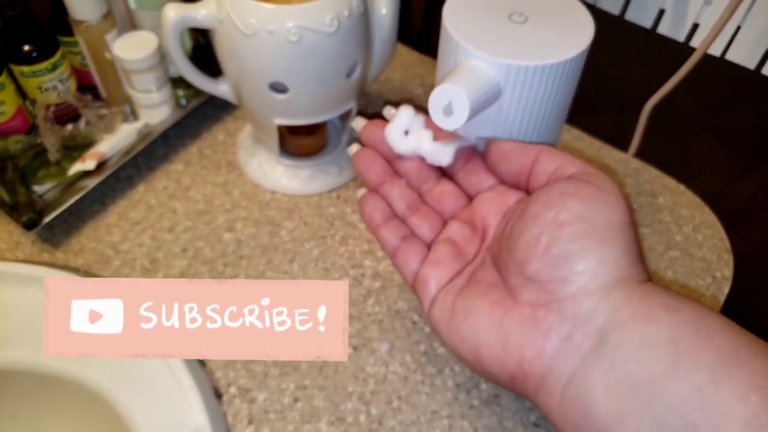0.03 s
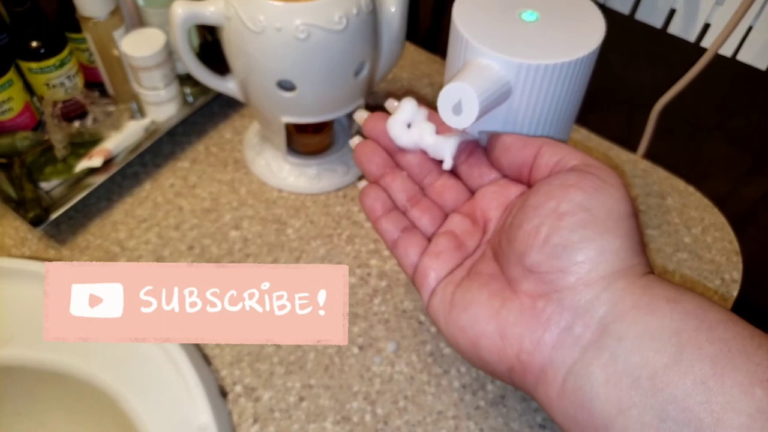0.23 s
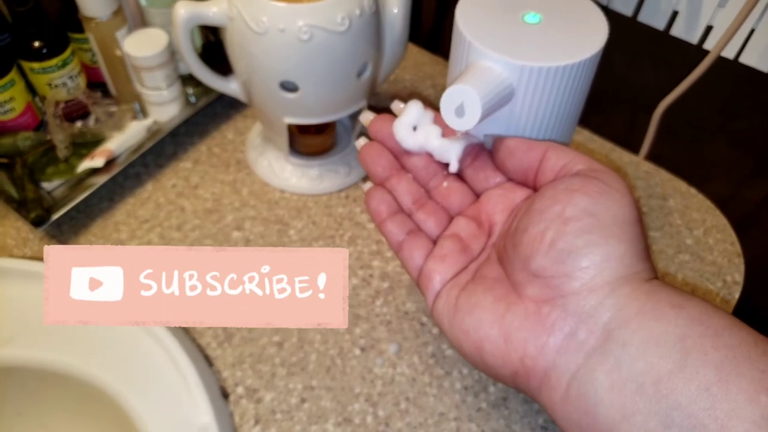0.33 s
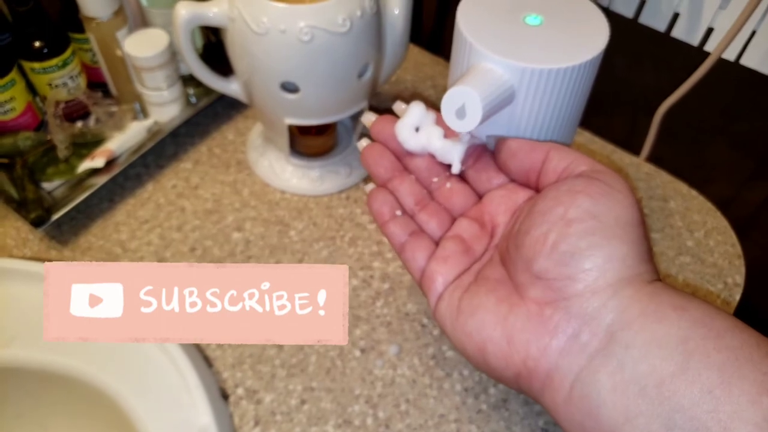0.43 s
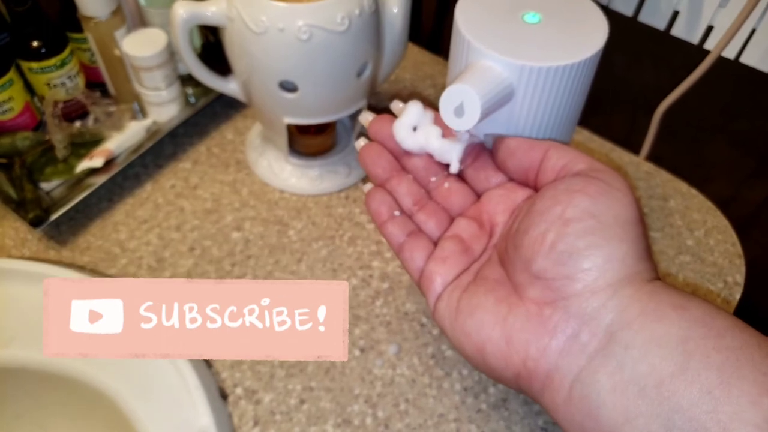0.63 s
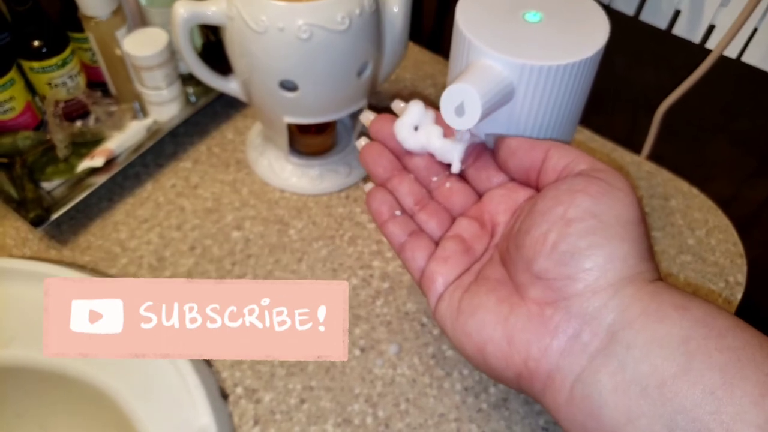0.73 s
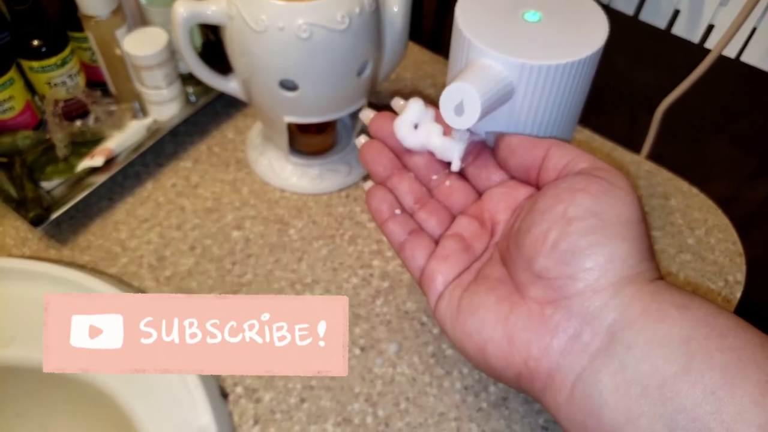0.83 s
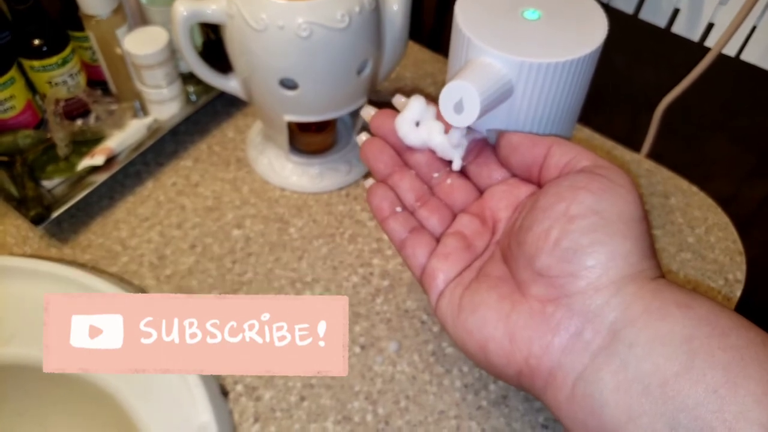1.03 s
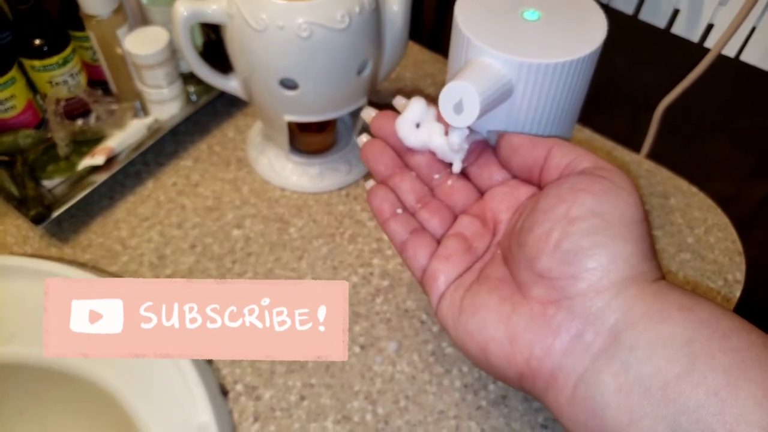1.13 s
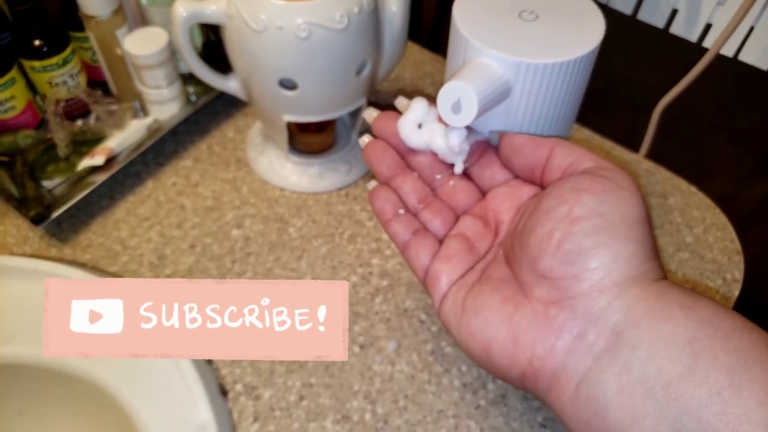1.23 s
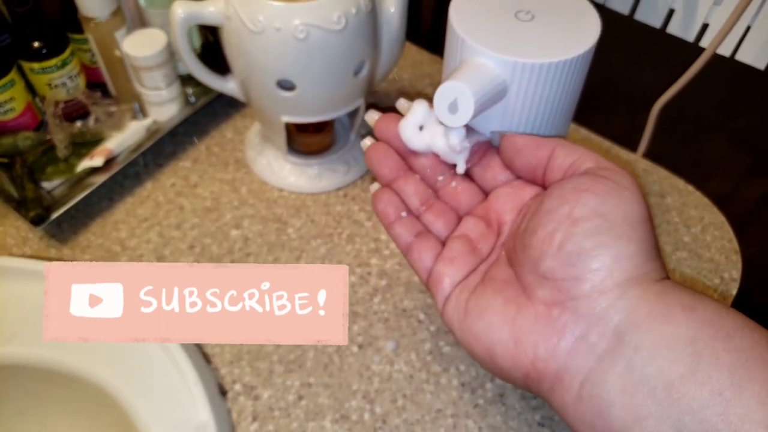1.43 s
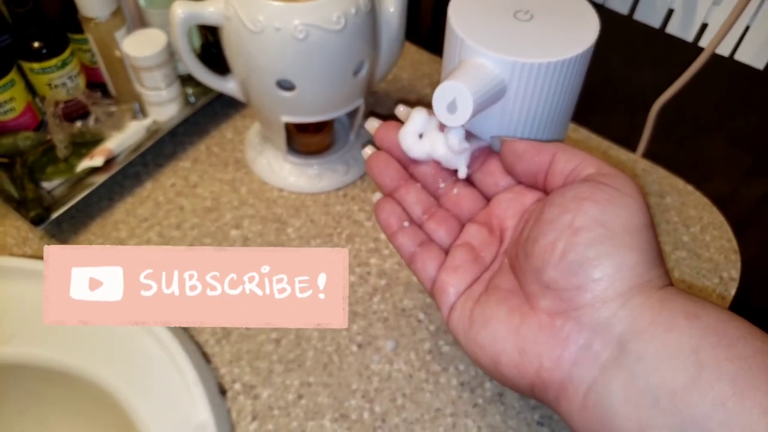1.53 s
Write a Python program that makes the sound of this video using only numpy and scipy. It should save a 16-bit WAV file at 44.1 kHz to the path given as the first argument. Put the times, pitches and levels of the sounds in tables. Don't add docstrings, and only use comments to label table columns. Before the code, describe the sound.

A small motorised soap dispenser starts almost at once, buzzing and rattling with a foamy hiss for about a second, then stops abruptly, leaving faint room hum; close stereo phone microphone, louder on the left, tiled bathroom.

```python
import sys
import numpy as np
from scipy import signal
from scipy.fft import rfft, irfft, next_fast_len
from scipy.io import wavfile
from scipy.ndimage import map_coordinates

SR = 44100
rng = np.random.default_rng(int(sys.argv[2]) if len(sys.argv) > 2 else 0)


def ratio(d):
    e = np.asarray(d, float) / 20
    return 10 ** e


def generate_wav(signal):
    frames = np.transpose(np.atleast_2d(signal))
    scaled = np.clip(frames, -1, 1) * 32767
    pcm = np.round(scaled).astype(np.int16)
    wavfile.write(sys.argv[1], SR, pcm)


N = 70560
T = np.arange(N) / SR

# t/s, level/dB
MAINS_LEVEL = [(0.0, -52), (0.254, -42.5), (0.356, -64), (0.386, -51), (0.436, -71), (0.462, -54),
               (0.762, -41), (0.962, -47.5), (1.252, -43), (1.6, -49.5)]
# f/Hz, level/dB
AIR_COLOUR = [(25, -2), (120, -2.5), (175, -29.5), (300, -22.5), (600, -43), (2000, -42), (8000, -54),
              (15900, -57)]
# f/Hz, likeness/0-1
AIR_LIKENESS = [(60, 0.45), (380, 0.375), (2380, 0.057), (15000, 0.024)]
# f/Hz, left over right/dB
AIR_BALANCE = [(60, 0), (240, -3), (950, 4), (3770, 14), (15000, -10)]
# f/Hz, width/Hz, level/dB
PIPE_MURMURS = [(305.2, 7.8, -73.5), (486, 21, -85.5), (1940, 260, -91.5)]
# f/Hz, width/Hz, depth/0-1
AIR_DEAD_BAND = (8300, 1100, .7)
# t/s, speed/turns per s
SHAFT_SPEED = [(.2, 63), (.27, 104), (.296, 112.6), (.318, 115), (.354, 117.6), (.4, 120), (.5, 119.5),
               (.64, 117.7), (.95, 116.9), (1.205, 116.8), (1.236, 112), (1.252, 107.5), (1.34, 57)]
# t/s, level/dB
PUMP_EFFORT = [(.196, -64), (.205, -53), (.238, -38.5), (.25, -33), (.33, -29), (.41, -28.5), (.49, -32.5),
               (.56, -31), (.61, -31), (.66, -27.5), (.75, -32), (.86, -31.5), (.93, -24.5), (1.0, -32),
               (1.08, -28.5), (1.17, -28.5), (1.24, -30.5)]
# t/s, peak level/dB, brightness/dB
HARD_KNOCKS = [(0.2209, -23.5, -28), (0.2409, -26, -19), (0.2461, -28, -4), (0.2524, -21.5, -6),
               (0.2733, -19.5, -12), (0.2942, -20, -20), (0.3123, -21.5, -1.5), (0.3465, -12, -11),
               (0.3614, -11, -6.5), (0.3885, -19, -12), (0.3956, -8, -12), (0.4029, -20, -14),
               (0.4389, -8.5, -22), (0.4468, -9, -10), (0.4638, -15.5, -12.5), (0.4727, -18, -13),
               (0.5051, -13.5, -25), (0.5133, -22.5, -0.5), (0.5305, -17, -9), (0.5418, -16, -29),
               (0.5563, -22.5, -19), (0.5729, -33, -12), (0.5815, -17, -22), (0.5901, -23, 0),
               (0.5963, -21.5, -20), (0.6223, -27, 3), (0.6316, -14.5, -7), (0.6487, -12.5, -6.5),
               (0.6748, -12.5, -12), (0.6896, -12, -9.5), (0.7138, -12, -9.5), (0.725, -15, -4),
               (0.7342, -24, -4.5), (0.7669, -16, -8.5), (0.7845, -14.5, -11), (0.7912, -14, -9),
               (0.8094, -18, -2.5), (0.8189, -24, -9), (0.8451, -20, -14), (0.8701, -23.5, 3),
               (0.8871, -21, -18), (0.9049, -26, -12), (0.9216, -22.5, 6.5), (0.9446, -26, 0),
               (0.9552, -9.5, -6), (0.9787, -8.5, -28), (1.0211, -11, -6), (1.0427, -12, -13),
               (1.0504, -10.5, -12), (1.057, -24, -12), (1.0834, -20, -12), (1.0933, -19, 0),
               (1.1003, -12.5, -9.5), (1.1449, -10.5, -10), (1.1774, -17.5, -10), (1.2098, -7, -24),
               (1.225, -20.5, -27), (1.2326, -9.5, -14), (1.2442, -26, -20), (1.2553, -11.5, -11)]
# t/s, peak level/dB, brightness/dB
LAST_KNOCKS = [
    (1.273, -25, -18),
    (1.291, -27, -26),
    (1.3075, -17, -26),
    (1.314, -24, -26),
    (1.326, -23, -26),
]
# f/Hz, width/Hz, level/dB
HOUSING_MODES = [(1376, 230, 0), (1944, 300, .5), (2380, 240, 2), (3300, 1200, -3), (4780, 280, -1),
                 (5390, 260, -3.5), (6590, 1760, -4), (9450, 3600, -27.5)]
# f/Hz, width/Hz, level/dB
BASE_THUD = (490, 650, -34)
# f/Hz, level/dB
FOAM_COLOUR = [(88, -54), (150, -17.5), (230, -22), (398, -16), (465, -5), (523, -14), (2400, -2),
               (6610, -16), (15900, -32.5)]
# f/Hz, level/dB
GEAR_COLOUR = [(150, -16), (250, -8), (500, -5), (1000, -1), (1500, 5), (2500, -36)]
# f/Hz, decay/s
TILE_DECAY = [(400, .3), (1500, .12), (7000, .2)]
# f/Hz, left over right/dB
PUMP_BALANCE = [(300, 2), (770, 15.5), (1200, 11), (2000, 18.5), (4200, 15), (6600, 24.5), (9300, 8),
                (15000, 2.5)]
# f/Hz, likeness/0-1
PUMP_LIKENESS = [(300, .85), (600, .45), (1800, .72), (4000, .55), (7000, .4), (15000, .3)]
# f/Hz, width/Hz, depth/0-1
COUNTER_NOTCHES = [(4500, 250, .75), (780, 110, .75), (4050, 200, .5)]
# multiple of shaft speed, left level/dB, right level/dB, left lead/radians
SHAFT_ORDERS = [(2, -51.5, -55, -0.5), (3, -52.5, -55.5, -0.59), (4, -50, -49.5, -0.67),
                (5, -50.5, -49, 1.86), (6, -51, -55.5, 0.5), (7, -72.5, -54.5, 1.7), (9, -54, -55.5, 1.4),
                (11, -45, -63, 1.3), (12, -40.5, -56, -1.95), (13, -54, -55, -0.21), (14, -43, -57, 1.1)]
# t/s, level/dB
COUNTER_PRESS = [(.27, -10), (.296, -3), (.318, 4), (.345, -2), (.4, -2), (.47, -4), (.53, -3), (.65, 1),
                 (.95, 1), (1.2, 0), (1.24, -1), (1.262, -14)]
# f/Hz, width/Hz, level/dB
COUNTER_RING = [(455, 26, 11), (446, 26, 8)]
# start t/s, end t/s, start f/Hz, end f/Hz, level/dB
LEAK_WHISTLES = [
    (1.33, 1.6, 9400, 9300, -80),
    (1.4, 1.54, 5900, 6700, -78),
    (1.38, 1.46, 10300, 9900, -80),
    (1.52, 1.6, 5300, 5100, -74),
    (1.53, 1.6, 3900, 3900, -79),
]
# f/Hz, left level/dB, right level/dB, decay/s
BUBBLE_RINGS = [(6650, -5, -14, .14), (7700, -5, -10, .05), (10300, -16, -2, .025), (11700, -18, -3, .04),
                (14200, -22, -8, .02)]


def unit(x):
    return x / np.sqrt(np.mean(x ** 2) + 1e-20)


def along(points, hz):
    f, v = np.transpose(points)
    return np.interp(np.log(hz + 1), np.log(f + 1), v)


def curve(rows):
    return np.interp(T, *np.transpose(rows))


def wobble(rate):
    return map_coordinates(rng.standard_normal(int(N * rate / SR) + 4), [T * rate])


def filtered(x, response):
    m = next_fast_len(N + SR // 2)
    return irfft(rfft(x, m) * response(np.fft.rfftfreq(m, 1 / SR)), m)[..., :N]


def noise(colour):
    return unit(filtered(rng.standard_normal((2, N)), lambda f: ratio(along(colour, f))))


def peak(f, hz, width, db):
    return ratio(db) * 1j * f * width / (hz * hz - f * f + 1j * f * width)


def spread(a, b, alike, left_db):
    def shared(f):
        return np.clip(along(alike, f), 0, 1) ** .5

    def level(f):
        return ratio(-along(left_db, f))

    right = filtered(a, lambda f: shared(f) * level(f))
    right = right + filtered(b, lambda f: np.sqrt(1 - shared(f) ** 2) * level(f))
    return np.array([a, right])


def bathroom():
    beat = 1 + .55 * np.cos(2 * np.pi * 4.15 * (T - .59))
    fan_db = -49 - 5.5 * (1 - np.clip(T / .5, 0, 1) ** 2)
    fan = ratio(fan_db) * beat * np.sin(2 * np.pi * 58.5 * T + .3 * wobble(6))
    mains = ratio(curve(MAINS_LEVEL)) * np.sin(2 * np.pi * 120 * T + 0.098 * wobble(15))
    hum_sides = ratio([3 + 0.23 * wobble(15), -3 + 2.2 * wobble(9.9)])
    hum = np.sqrt(2) * (fan + mains) * hum_sides

    air = ratio(-51) * spread(*noise(AIR_COLOUR), AIR_LIKENESS, AIR_BALANCE)
    for hz, width, db in PIPE_MURMURS:
        both, left, right = filtered(rng.standard_normal((3, N)), lambda f: peak(f, hz, width, 0) ** 2)
        air += ratio(db) * unit(both + 0.31 * np.array([left, right]))
    lift = (ratio(10) - 1) * (T > .9) * filtered(air, lambda f: 1j * f / (1j * f + 300))
    gap_hz, gap_width, gap_depth = AIR_DEAD_BAND
    air = filtered(air + lift, lambda f: 1 - gap_depth * peak(f, gap_hz, gap_width, 0))
    fade_in = np.minimum(T / .02, 1)
    return hum + fade_in * air


def coast():
    return ratio(-170 * np.maximum(T - PUMP_EFFORT[-1][0], 0))


def effort():
    stop = ratio(-500 * np.maximum(T - 1.335, 0))
    return ratio(curve(PUMP_EFFORT)) * coast() * stop * (T > PUMP_EFFORT[0][0])


def ticks(turns, turn_db):
    ticks_a_turn = 18
    draw = np.clip(rng.standard_normal((len(turn_db), ticks_a_turn, 3)), -1.8, 1.8)
    late = .45 * draw[..., 0] ** 2
    size = ratio(turn_db[:, None] + 3 * draw[..., 1] - 1.5 * late) * np.sign(draw[..., 2])
    place = np.interp(np.arange(len(turn_db))[:, None] + late, turns, np.arange(N))
    return effort() * unit(np.bincount(place.astype(int).ravel(), size.ravel(), N))


def housing_modes(f, rows):
    return sum((-1) ** k * peak(f, *row) for k, row in enumerate(rows))


def low_housing(f):
    panels = peak(f, 3140, 6400, 0.1) * housing_modes(f, HOUSING_MODES[:6])
    return panels / (1 + 1j * f / 4550) + peak(f, *BASE_THUD)


def high_housing(f):
    parts = peak(f, 7760, 6800, 0.089) ** 2 * (housing_modes(f, HOUSING_MODES[6:]) + 0.22)
    return parts + 0.092 * 1j * f / (1j * f + 11000)


def rattle(turns):
    turn_db = 1.2 * np.clip(rng.standard_normal(int(turns[-1]) + 1), -1.8, 1.8)
    rattle_db, bright_ticks_db = -5, -4.5
    dull, bright = np.zeros((2, 2, N + SR))
    dull[:, :N] = ratio(rattle_db) * np.array([ticks(turns, turn_db) for _ in range(2)])
    bright_ticks = np.array([ticks(turns, turn_db) for _ in range(2)])
    bright[:, :N] = ratio(rattle_db + bright_ticks_db) * coast() * bright_ticks

    t = T[:SR // 20]
    shape = ratio(-60 * t / .017) * (1 - np.exp(-t / .001))
    for s, db, bright_db in [*HARD_KNOCKS, *LAST_KNOCKS]:
        burst = rng.standard_normal((2, 2, len(t))) * shape
        same_energy = np.linalg.norm(shape) / np.linalg.norm(burst, axis=2, keepdims=True)
        burst = burst * ratio(db - 3) * same_energy
        start = round(s * SR)
        dull[:, start:start + len(t)] += burst[0]
        bright[:, start:start + len(t)] += burst[1] * ratio(bright_db + 4.0)
    return 3.135 * filtered(dull[:, :N], low_housing) + 2.8 * filtered(bright[:, :N], high_housing)


def hiss(turns):
    stroke = 1 + 0.135 * np.cos(2 * np.pi * (turns - .1))
    lumps = ratio(1.5 * wobble(90)) * stroke
    foam = lumps * rng.standard_normal((2, N))
    foam = unit(filtered(foam, lambda f: ratio(along(FOAM_COLOUR, f))))
    return ratio(-5.5) * coast() * effort() * foam


def grind(turns):
    slow = np.clip(1 - curve(SHAFT_SPEED) / 117, 0, 1)
    lumps = (1 + .6 * np.cos(2 * np.pi * turns)) * rng.standard_normal((2, N))
    rumble = unit(filtered(lumps, lambda f: ratio(along(GEAR_COLOUR, f))))
    return ratio(0.5) * slow * effort() * rumble


def tiles(x):
    hz, t, z = signal.stft(rng.standard_normal((2, SR // 2)), SR, nperseg=256)
    fading = ratio(-60 * t / along(TILE_DECAY, hz)[:, None])
    tail = signal.istft(z * fading, SR, nperseg=256)[1]
    return signal.fftconvolve(x[None], tail / np.linalg.norm(tail[0]), axes=1)[:, :N]


def drone(turns):
    start = 1 / (1 + np.exp((.275 - T) / .045 * 3))
    stop = 1 / (1 + np.exp((T - 1.252) / .025 * 3))
    main_order, loose_order = 4, 5
    out = np.zeros((2, N))
    for k, left_db, right_db, lead in SHAFT_ORDERS:
        phase = 2 * np.pi * k * turns + rng.uniform(0, 5.4) + .035 * k * wobble(29.16)
        if k == loose_order:
            sway_db = 2.5 * wobble(24.67) + 9 * (T - 1)
        else:
            sway_db = 1.2 * wobble(19.35) + curve(COUNTER_PRESS) * (k == main_order)
        for side, db in enumerate((left_db, right_db)):
            level = np.sqrt(2) * ratio(db + sway_db + 1.03 * wobble(20.46))
            out[side] += level * np.sin(phase + lead * (1 - side))
    return np.array([filtered(start * stop * hum, lambda f: 1 + peak(f, *ring))
                     for hum, ring in zip(out, COUNTER_RING)])


def leaks():
    out = np.zeros(N)
    for start, end, hz0, hz1, db in LEAK_WHISTLES:
        u = np.clip((T - start) / (end - start), 0, 1)
        pitch = (hz0 + (hz1 - hz0) * u) * (1 + .015 * wobble(300))
        level = ratio(db + 4 * wobble(40)) * wobble(500) * np.sin(np.pi * u) ** .4
        out += level * np.sin(2 * np.pi * np.cumsum(pitch) / SR)
    return out


def bubble():
    burst_s = 1.4985
    t = np.maximum(T - burst_s, 0)
    ring = np.zeros((2, N))
    for hz, left_db, right_db, t60 in BUBBLE_RINGS:
        level = ratio(np.array([[left_db], [right_db]]) - 60 * t / t60 + 3.4 * wobble(100))
        ring += level * np.sin(2 * np.pi * hz * t + 1.3 * wobble(280))
    fizz = filtered(rng.standard_normal((2, N)), lambda f: peak(f, 9000, 13000, 0) ** 2) * [[.45], [1]]
    fading = 1.5 * ratio(-60 * t / .035) + .4 * ratio(-60 * t / .7)
    return ratio(-54) * (T > burst_s) * (ring + fading * fizz)


def counter_cancels(f):
    return np.prod([1 - depth * peak(f, hz, width, 0) for hz, width, depth in COUNTER_NOTCHES], axis=0)


def scene():
    turns = np.cumsum(curve(SHAFT_SPEED)) / SR
    near, near2 = rattle(turns) + [leaks(), leaks()]
    jet, jet2 = hiss(turns) + grind(turns)
    left = near + jet + ratio(-8.5) * tiles(near + jet)[0]
    other = .5 * near2 + 2.13 * jet2 + 1.97 * tiles(near2 + jet2)[1]
    pump = filtered(spread(left, other, PUMP_LIKENESS, PUMP_BALANCE), counter_cancels)
    return ratio(5.0) * pump + drone(turns) + bathroom() + bubble()


def roll_off(x):
    return signal.sosfilt(signal.butter(12, 16050, fs=SR, output="sos"), x)


def record(dry):
    mix = filtered(dry, lambda f: (f < 15950) * (1j * f / (1j * f + 30)) ** 2)
    return roll_off(mix)


dry = scene()
out = record(dry)
generate_wav(out)
```